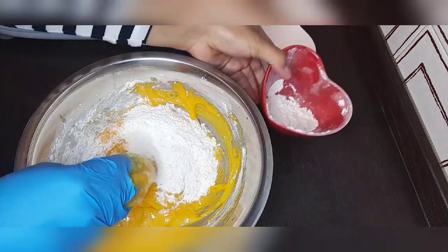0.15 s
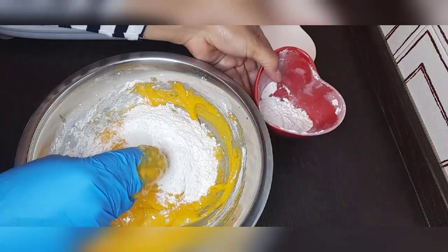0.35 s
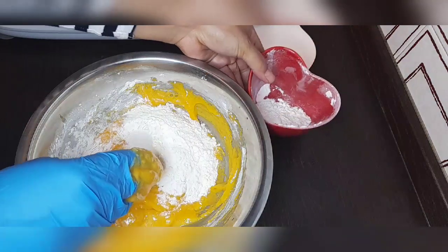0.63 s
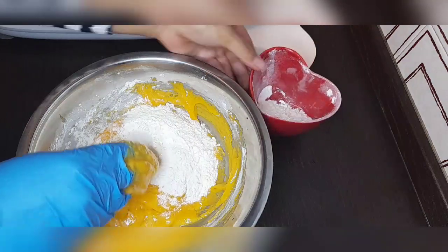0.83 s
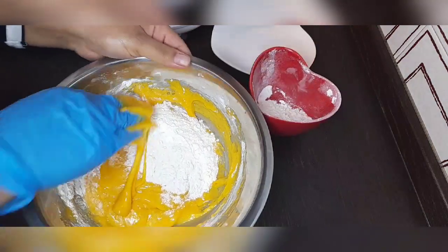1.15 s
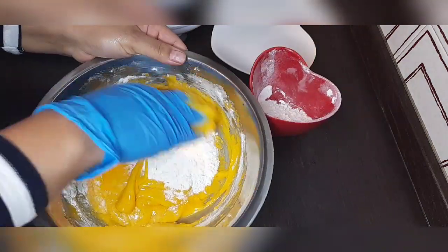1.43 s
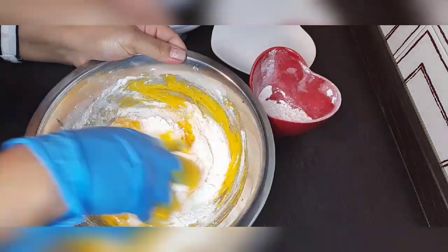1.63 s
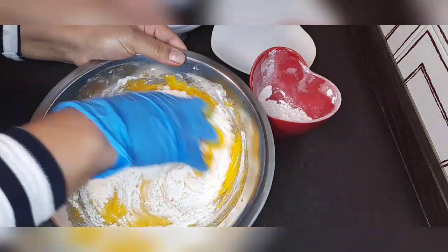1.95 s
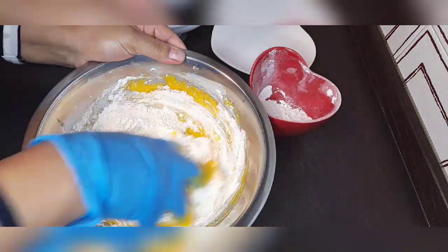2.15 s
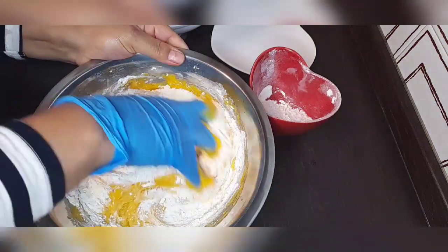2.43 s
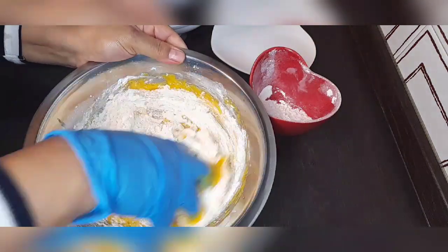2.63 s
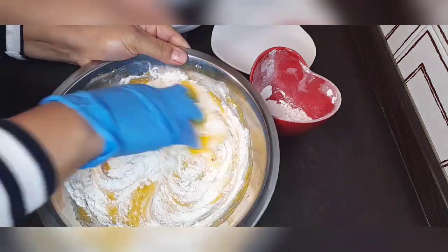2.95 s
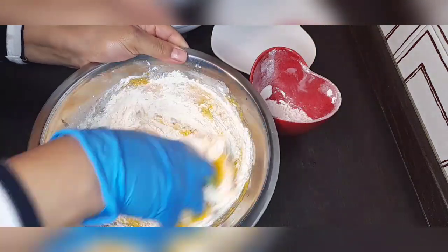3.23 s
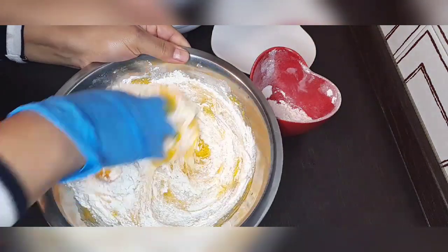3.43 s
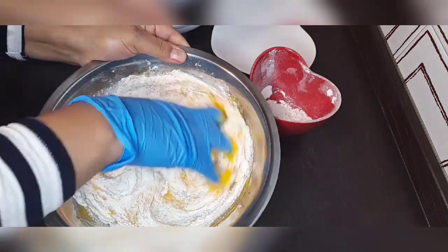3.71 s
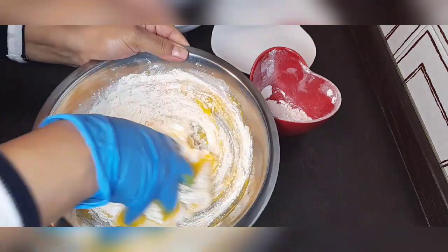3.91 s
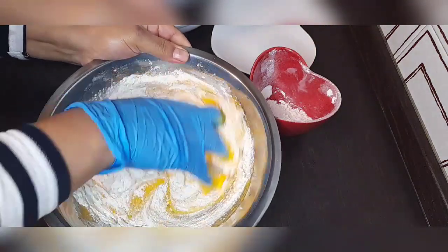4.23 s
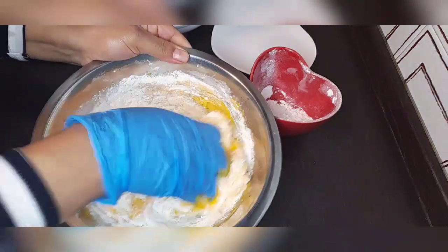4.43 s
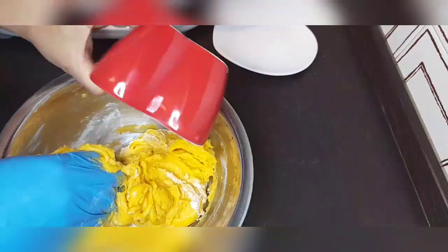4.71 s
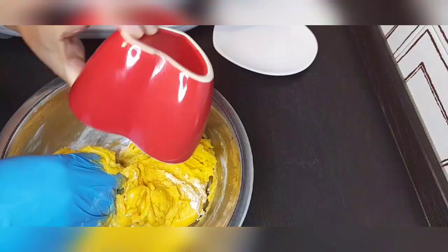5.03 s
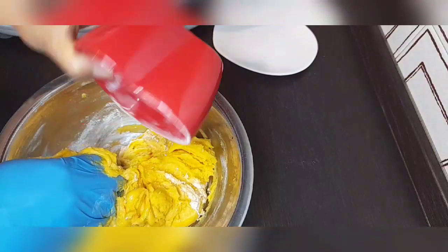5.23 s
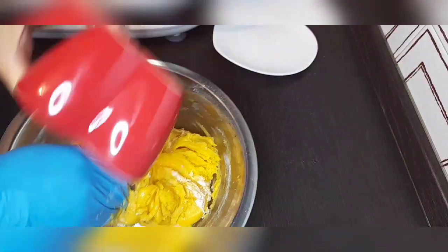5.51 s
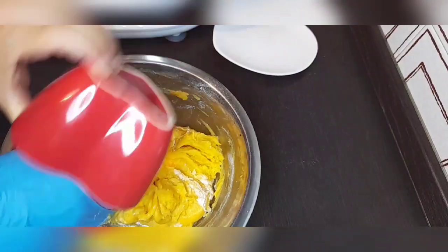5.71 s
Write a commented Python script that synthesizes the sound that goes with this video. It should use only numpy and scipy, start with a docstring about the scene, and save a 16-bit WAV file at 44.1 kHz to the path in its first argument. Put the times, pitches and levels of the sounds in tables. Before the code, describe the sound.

Mostly quiet, close stereo sound of dough being worked in a wide metal bowl. A cup is put down with a woody knock, followed half a second later by the loudest event, a hard bowl clatter. Then soft hissing strokes, tiny flour crunches and muffled taps, a faint nail tick, and a bright ceramic knock on steel. Short room tail, deep soft rumble and low hum.

```python
"""Mixing dough in a steel bowl

A gloved hand works flour round a wide steel bowl: swelling noise bands hiss and rumble, grains crunch.
A ceramic cup is set down on the kitchen counter; the bowl rocks hard once, and bumps softly on dough
before and after. Late on, the cup knocks on the rim. Blows are dense noise bursts plus ringing sine modes.
A noise tail gives the small room; soft air noise, a deep rumble and a faint hum lie underneath."""
import sys
import numpy as np
from scipy import signal
from scipy.fft import rfft, irfft, next_fast_len
from scipy.io import wavfile
from scipy.ndimage import uniform_filter1d

SR = 44100
rng = np.random.default_rng(int(sys.argv[2]) if len(sys.argv) > 2 else 0)


def store_wav(level_fs):
    """Save 16-bit WAV to argv[1]."""
    pcm = np.round(np.clip(np.atleast_2d(level_fs), -1, 1) * 32767)
    wavfile.write(sys.argv[1], SR, pcm.T.astype(np.int16))


N = 258426  # length in samples

# Pushes through the flour: peak_s, effort_db, attack_s, release_s (of the rub), bowl_rumble_db
SWEEPS = [(0.33, -91, .12, .04, -49), (1.981, -70, .15, 0.26, -59), (2.249, -65, .07, 0.057, -76),
          (2.84, -64, 0.1, 0.1, -73), (3.36, -64, 0.21, 0.096, -50.5), (3.98, -60, 0.18, 0.16, -50),
          (4.60, -60, 0.21, 0.049, -47.5), (5.07, -61, 0.21, 0.073, -51.5)]
# Glove skidding on the steel between pushes: peak_s, level_db, release_s
SKIDS = [(0.03, -70.5, .12), (0.19, -70.5, 0.12), (1.2, -64.5, .17), (3.186, -60, 0.097),
         (4.194, -58, 0.057), (4.43, -67, 0.044)]
# Loose flour sliding off the wall: peak_s, level_db
SLIDES = [(0.365, -74), (1.229, -78), (1.845, -63), (3.44, -66), (5.1, -69)]
# Flour crunching under the fingers: centre_s, half_length_s, level_db
CRUNCHES = [(2.233, 0.004, -54), (2.245, 0.03, -58), (2.507, 0.0046, -62), (2.796, 0.0022, -60),
            (2.804, 0.053, -59), (3.272, 0.07, -63), (5.019, 0.019, -59.5)]
# The hand stays in the flour: from_s, until_s
STIRRING_S = (1.665, 5.25)
# Colour of the glove rubbing: freq_hz, density_db (relative, per Hz)
RUB_COLOUR = [(400, -6.5), (900, 3), (1080, 2), (1280, 8), (1600, -1.5), (2000, 2), (3000, -0.5),
              (5000, -0.5), (7000, -5), (10000, -20)]
# Colour of loose powder: freq_hz, density_db (relative, per Hz)
POWDER_COLOUR = [(3000, -38.5), (5500, 1.5), (7200, 6.5), (8800, -1), (12500, 2), (14000, -19)]
# Colour of crunching flour: freq_hz, density_db (relative, per Hz)
CRUNCH_COLOUR = [(500, 12), (1200, 22), (2200, 13), (3500, 5.5), (6000, -0.5), (12000, -10)]
# Colour of the bowl rumbling: freq_hz, density_db (relative, per Hz)
RUMBLE_COLOUR = [(55, -33.5), (85, -6), (100, 11), (120, -20), (170, -15.5), (380, -23.5), (700, -25),
                 (1500, -66)]
DRAG_DB, IDLE_DB = -76, -83.5  # effort added while stirring; effort of the hand lying nearly still
RUB_DB, POWDER_DB = -1, -1.1  # shares of a firm push
FIRM_PUSH_DB, POWDER_GROWTH = -59.5, 1.27  # exponent: powder outgrows the rubbing under pressure
RUMBLE_RELEASE_S, RUMBLE_IDLE_DB = .12, -60  # one release for every push; steady floor
SKID_ATTACK_S = 0.024
SLIDE_ATTACK_S, SLIDE_RELEASE_S = 0.017, 0.014


def hand():
    """The glove rubs flour round the wall: powder hisses, the bowl rumbles, packed flour crunches."""
    t = np.arange(N) / SR
    in_flour = 1. * ((t > STIRRING_S[0]) & (t < STIRRING_S[1]))
    stirring = uniform_filter1d(in_flour, size=4000)
    drag = from_db(IDLE_DB) + from_db(DRAG_DB) * stirring

    # independent noises add in power, so their envelopes combine as root sums of squares
    pushes = [from_db(db) * swell(s, attack, release) for s, db, attack, release, _ in SWEEPS]
    effort = np.linalg.norm([drag] + pushes, axis=0)
    weights = [from_db(db) * swell(s, attack, RUMBLE_RELEASE_S) for s, _, attack, _, db in SWEEPS]
    weight = np.linalg.norm(weights, axis=0)
    skid = sum(from_db(db) * swell(s, SKID_ATTACK_S, release) for s, db, release in SKIDS)
    slide = sum(from_db(db) * swell(s, SLIDE_ATTACK_S, SLIDE_RELEASE_S) for s, db in SLIDES)
    pressure = effort / from_db(FIRM_PUSH_DB)
    stirred_up = from_db(FIRM_PUSH_DB + POWDER_DB) * pressure ** POWDER_GROWTH

    rub = np.hypot(from_db(RUB_DB) * effort, skid) * noise(RUB_COLOUR, N)
    powder = np.hypot(stirred_up, slide) * noise(POWDER_COLOUR, N)
    rumble = np.hypot(weight, from_db(RUMBLE_IDLE_DB)) * noise(RUMBLE_COLOUR, N)
    squeeze = sum(from_db(db) * np.exp(-((t - s) / length) ** 2) for s, length, db in CRUNCHES)
    crunch = squeeze * grains() * noise(CRUNCH_COLOUR, N)
    return (rub + powder + rumble + crunch) * from_db([[-.6], [.6]])


def swell(peak_s, attack_s, release_s):
    """Exponential rise to 1 and fall from it, given as time constants."""
    late = np.arange(N) / SR - peak_s
    return np.exp(-np.abs(late) / np.where(late < 0, attack_s, release_s))


GRAINS_PER_S, GRAIN_SPREAD_DB, GRAIN_S = 650, 2.5, .001  # mean rate; size spread; decay time constant


def grains():
    """Loudness of many tiny collapsing pockets of flour of uneven size; rms 1."""
    born = rng.random(N) < GRAINS_PER_S / SR
    sizes = from_db(GRAIN_SPREAD_DB * np.minimum(rng.exponential(1, N), 2))
    decay = np.exp(-1 / (GRAIN_S * SR))
    return rms_one(signal.lfilter([1], [1, -decay], born * sizes + 1e-18))


# Bowl rocking on the counter: start_s, level_db, driven_low_hz, driven_high_hz, free_rim_db
KNOCKS = [(1.4573, -26.5, 1103, 11880, -26.5), (1.462, -22, 211.4, 11980, -50.5),
          (1.4770, -15, 143.1, 1960, -51), (1.4808, -11.5, 259, 3180, -29.5),
          (1.4976, -14.5, 330, 4000, -50), (1.522, -27, 109, 754, -63), (1.5360, -21, 171, 1022, -92)]
# Lasting modes of the bowl: pitch_hz, level_db (relative), t60_s (before damping and the ring limit)
BOWL_MODES = [(92.15, -7.5, 0.56), (189.3, -2.5, 0.43), (272, -3.5, 0.53), (312, -0.5, .25),
              (388.3, 1, 0.24), (447, -9.5, 0.4), (533, -19.5, 0.5), (618, -21.5, 0.73), (760.8, -6, 0.43),
              (797, -10.5, 0.36), (874, -8, 0.17), (1015, -5.5, 0.23), (1107, -18.5, 0.99),
              (1207, -5.5, 0.36)]
# Modes of the free rim: pitch_hz, level_db (relative), t60_s (before damping and the ring limit)
RIM_MODES = [(1864.3, 3, 0.57), (2046, -3.5, 0.4), (2460, -7, .24), (4350, -16.5, .18), (5850, -15.5, 0.25),
             (9650, -24.5, .3), (12000, -18, .12)]
# Crowd of short-lived bowl modes: freq_hz, density_db (relative, per Hz)
BOWL_BODY = [(40, -19.5), (90, -2.5), (180, -10), (340, 2.5), (500, -11), (800, -8.5), (1400, -9.5),
             (2250, -23), (3100, -32.5), (4400, -31), (7000, -27.5), (9000, -35), (13000, -32)]
# Quickly damped bowl resonances: centre_hz, width_hz, level_db (before the shared peak level)
BOWL_PEAKS = [(3984, 27, -6.5), (3600, 130, -9.5), (4370, 53, -1), (5720, 23, 1.5), (7300, 35, -22.5),
              (9000, 43, -12), (10510, 45, -11.5), (10700, 130, -13.5), (12000, 34, -16.5)]
# Decay of the dense modes in bowl, counter and cup: freq_hz, t60_s
BODY_DECAY = [(100, 0.28), (400, 0.1), (1500, 0.073), (5000, 0.13), (12000, 0.055)]


def steel_bowl():
    """The bowl clatters on the counter: dense wall modes die quickly, while bowl and rim modes ring on."""
    clatter, ring = np.zeros((2, 2, N))
    wall = with_peaks(BOWL_BODY, BOWL_PEAKS, peak_db=-22.5)
    for s, db, low_hz, high_hz, rim_db in KNOCKS:
        body = dying(wall, BODY_DECAY, size=8192)
        add(clatter, s, contact(body, db, low_hz, high_hz))
        modes = ringing(BOWL_MODES, damping=1.1, size=28000)
        add(ring, s, contact(modes, db - 6.5, low_hz, high_hz))
        add(ring, s, from_db(rim_db) * ringing(RIM_MODES, damping=0.96, size=36000))
    return (kitchen(clatter, wet_db=-7.0) + kitchen(ring, wet_db=-17)) * from_db([[-1.9], [.6]])


# Bumps cushioned by dough: start_s, tap_level_db, tap_high_hz, counter_boom_db
BUMPS = [(0.109, -50, 490, -66), (1.235, -46, 519, -71.5), (2.0050, -48.5, 480, -51),
         (3.0090, -43, 790, -41), (3.3480, -57.5, 580, -55), (3.529, -47.5, 520, -54.5),
         (4.536, -50.5, 1200, -53.5), (4.9569, -51.5, 1390, -57), (5.165, -50.5, 1200, -43)]
# Dull tap of the cushioned bowl: freq_hz, density_db (relative, per Hz)
TAP_COLOUR = [(90, -18), (220, -5.5), (380, 4), (520, -6.5), (750, -1), (1200, -12.5), (2500, -13),
              (6000, -10)]
# Counter booming under the bowl: pitch_hz, level_db (relative), t60_s (before damping and the ring limit)
COUNTER_MODES = [(88.3, -1.5, 0.56), (96.3, -3, 0.42), (142, -5, 0.19)]


def bumps():
    """The held bowl gives a short, dull tap, and the counter booms under it."""
    out = np.zeros((2, N))
    for s, db, high_hz, boom_db in BUMPS:
        tap = dying(TAP_COLOUR, [(100, 0.067), (1500, 0.05)], size=4096)
        boom = ringing(COUNTER_MODES, damping=1.1, size=16000)
        add(out, s, contact(tap, db, 250, high_hz))
        add(out, s, contact(boom, boom_db, 40, 240.2))
    return kitchen(out, wet_db=-6.0) * from_db([[-1.2], [1.2]])


# Cup landing on the counter: start_s, level_db, driven_low_hz, driven_high_hz, foot_ring_db
LANDING = [(0.8631, -29.5, 795, 1794, -53.5), (0.9085, -23, 200.2, 5527, -50),
           (0.9197, -19.5, 110, 1017, -60), (0.9300, -22.5, 281.5, 3986, -49.5),
           (0.9380, -27, 1400, 4000, -52), (0.9485, -24.5, 181.3, 699, -65.5)]
# Counter ringing under the cup: pitch_hz, level_db (relative), t60_s (before damping and the ring limit)
LANDING_MODES = [(97.1, -9, 0.51), (185, -4, 0.48), (231.8, -5, 0.13), (304, -8.5, 0.35), (389.2, 2, 0.22),
                 (614, -16, .45), (666, -13.5, .48), (725, -17, 1), (844, -12.5, .25), (940.6, -21, .6),
                 (1200, -16, 0.31), (1420, -19, .5), (1914, -20, 0.2), (2369, -24, 0.56)]
# Thin ring of the cup on its foot: pitch_hz, level_db (relative), t60_s (before damping and the ring limit)
FOOT_MODES = [(2425, 2, 0.24), (3473, -14, 0.24), (3820, -0.5, .2), (3900, -15.5, .45), (4280, -7.5, .22),
              (4721, -12.5, .16), (5507, -13, .2), (6180, -18, .5), (6625, -15, 0.48), (6830, -11, .16),
              (8600, -16, .12), (10700, -17, .12), (12100, -17, 0.23)]
# Crowd of short-lived counter modes: freq_hz, density_db (relative, per Hz)
COUNTER_BODY = [(40, -24), (100, 0.5), (180, 0.5), (360, 3.5), (500, -7), (800, -8), (1300, -13),
                (2400, -22.5), (3100, -38), (7000, -25), (9000, -28), (13000, -24.5)]
# Quickly damped counter resonances: centre_hz, width_hz, level_db (before the shared peak level)
COUNTER_PEAKS = [(1035, 220, -3.5), (1492, 33, -2), (1670, 18.26, -8.5), (1870, 26.9, -12.5),
                 (1940, 27.62, -11.5), (2300, 26, -11), (2560, 27, -15.5), (2950, 35, -20),
                 (4040, 140, -18), (4100, 82, -20.5), (5400, 170, -33.5), (6320, 100, -16)]


def cup_set_down():
    """The foot of the cup touches, then chatters flat; most of the sound is the counter thudding."""
    clatter, ring = np.zeros((2, 2, N))
    top = with_peaks(COUNTER_BODY, COUNTER_PEAKS, peak_db=-3.5)
    for s, db, low_hz, high_hz, foot_db in LANDING:
        body = dying(top, BODY_DECAY, size=8192)
        add(clatter, s, contact(body, db, low_hz, high_hz))
        modes = ringing(LANDING_MODES, damping=1.0, size=24000)
        add(ring, s, contact(modes, db - 5.0, low_hz, high_hz))
        add(ring, s, from_db(foot_db) * ringing(FOOT_MODES, damping=0.73, size=30000))
    return (kitchen(clatter, wet_db=-7) + kitchen(ring, wet_db=-15)) * from_db([[-1.9], [1.4]])


# Cup touching the rim: start_s, level_db, driven_low_hz, driven_high_hz, lasting_ring_db
CLINKS = [(5.3320, -35, 690, 9000, -64.5), (5.3348, -14.5, 79.4, 13000, -25.5),
          (5.3399, -32, 6000, 13000, -61.5), (5.3470, -17, 298, 2570, -42)]
# Fingernail ticking on the cup: start_s, level_db
TICK = (5.2375, -56)
# Colour of that tick: freq_hz, density_db (relative, per Hz)
TICK_COLOUR = [(1000, -9), (5000, -11.5), (6800, 2.5), (8500, -4.5), (13000, -8.5)]
# Lasting modes of the cup: pitch_hz, level_db (relative), t60_s (before damping and the ring limit)
CUP_MODES = [(128.3, -9.5, 0.55), (174, -10.5, 0.34), (677, -11.5, 0.6), (708, -2, 0.48),
             (920, -11.5, 0.42), (1152, -7.5, 0.66), (1228, -2, 0.35), (1305, 4.5, 0.52), (1399, -5, 0.54),
             (1613, -10.5, 0.38), (1810, -10, 0.5), (1995, -11, 0.72), (2334, -7, .4), (2450, -7.5, 0.58)]
# High, glassy ring on the rim: pitch_hz, level_db (relative), t60_s (before damping and the ring limit)
GLAZE_MODES = [(6700, -15, 0.24), (6861, -13, .33), (7130, -13.5, 0.34), (10750, -20, .16)]
# Crowd of short-lived cup modes: freq_hz, density_db (relative, per Hz)
CUP_BODY = [(50, -19), (130, 1), (230, -8.5), (450, -21), (680, -3), (920, -8.5), (1350, 0), (2500, -6.5),
            (2850, -17.5), (5800, -28), (6900, -15.5), (7900, -28.5), (10800, -24), (12500, -34.5)]
# Quickly damped cup resonances: centre_hz, width_hz, level_db (before the shared peak level)
CUP_PEAKS = [(3640, 45, -30.5), (3890, 75, -15.5), (5240, 90, -11), (5850, 46, -14.5), (6470, 32, -7),
             (6700, 77, 3.5), (7400, 31, -11.5), (7300, 54, -15.5)]


def cup_on_rim():
    """A fingernail ticks on the cup; hard ceramic cracks on the steel rim, rebounds and rings briefly."""
    crack, ring = np.zeros((2, 2, N))
    tick_s, tick_db = TICK
    tick = dying(TICK_COLOUR, [(1000, .025), (7000, 0.056), (13000, .02)], size=4096)
    add(crack, tick_s, contact(tick, tick_db, 900, 13000))
    wall = with_peaks(CUP_BODY, CUP_PEAKS, peak_db=-6)
    modes = list(CUP_MODES) + list(GLAZE_MODES)
    for s, db, low_hz, high_hz, ring_db in CLINKS:
        body = dying(wall, BODY_DECAY, size=8192)
        add(crack, s, contact(body, db, low_hz, high_hz))
        add(ring, s, from_db(ring_db) * ringing(modes, damping=1.03, size=32000))
    return (kitchen(crack, wet_db=-8.5) + kitchen(ring, wet_db=-14.5)) * from_db([[-1.4], [.6]])


# Decay of the room tail: freq_hz, t60_s
KITCHEN_DECAY = [(80, 0.74), (250, 0.36), (600, 0.66), (1500, 0.59), (4000, 0.65), (7000, .46),
                 (12000, 0.57)]


def kitchen(x, wet_db):
    """Add the room: a diffuse noise tail that builds up quickly and dies at its own rate per octave."""
    colour = [(60, 0), (400, 3), (2000, 0.0), (6000, -3.5), (13000, -0.5)]
    tail = dying(colour, KITCHEN_DECAY, size=36000)
    tail = tail * (1 - fade(0.015, tail.shape[-1]))
    tail = tail / np.sqrt(np.sum(tail ** 2) / 2)  # unit energy per side
    return x + from_db(wet_db) * signal.fftconvolve(x, tail, axes=-1)[:, :N]


# Colour of the room air: freq_hz, density_db (relative, per Hz)
AIR_COLOUR = [(30, -28), (55, -14.5), (100, -5), (150, -15), (200, -25.5), (380, -16), (600, -32.5),
              (1000, -30.5), (2250, -41.5), (3400, -49), (5500, -50.5), (13000, -59)]
# Level curve of the deep rumble: time_s, level_db
DEEP_LEVEL = [(0, -54.5), (0.9, -53), (1.9, -53.5), (2.3, -59.5), (3.0, -59), (3.3, -57), (3.7, -61.5),
              (5.86, -62.5)]
# Colour of the deep rumble: freq_hz, density_db (relative, per Hz)
DEEP_COLOUR = [(25, -38), (36, -19.5), (48, 14), (62, 12.5), (78, -5.5), (130, -42)]
# Steady hum: pitch_hz, level_db (rms)
HUM = [(50, -74.5), (99.5, -66.5), (443, -80)]


def room_tone():
    """Soft air noise, a deep rumble of drifting level, and the steady sines of an appliance hum."""
    t = np.arange(N) / SR
    hum = sum(from_db(db) * np.sqrt(2) * np.sin(2 * np.pi * (hz * t + rng.random())) for hz, db in HUM)
    deep = from_db(np.interp(t, *np.transpose(DEEP_LEVEL))) * noise(DEEP_COLOUR, N)
    air = from_db(-62) * noise(AIR_COLOUR, N)
    return (air + deep + hum) * from_db([[-1.1], [.9]])


def contact(sound, db, low_hz, high_hz):
    """A blow drives only part of the range; its level is that of the first hundredth of a second."""
    driven = cut(cut(sound, low_hz, "high", order=1), high_hz, "low")
    return from_db(db) * driven / np.sqrt(np.mean(driven[:, :SR // 100] ** 2))


def with_peaks(spectrum, peaks, peak_db):
    """Raise resonances out of a smooth spectrum by adding their power."""
    hz = np.arange(20, 15000, 10)
    power = from_db(at_hz(spectrum, hz)) ** 2
    for centre, width, db in peaks:
        power = power + from_db(db + peak_db) ** 2 / (1 + ((hz - centre) / width) ** 2) ** 2
    return np.c_[hz, 10 * np.log10(power)]


def dying(spectrum, decay, size):
    """A burst of dense modes as coloured noise; each octave dies at its own rate."""
    bins = rfft(noise(spectrum, size))
    hz = np.fft.rfftfreq(size, 1 / SR)
    centres = np.geomspace(55, 14080, 9)
    # overlapping octave bands that sum to the whole
    shares = [at_hz(np.c_[centres, row], hz) for row in np.eye(len(centres))]
    return sum(irfft(bins * share, size) * fade(at_hz(decay, centre), size)
               for centre, share in zip(centres, shares))


LONGEST_RING_S = .75  # upper limit of any mode's t60


def ringing(modes, damping, size):
    """Distinct decaying sine modes, each reaching the two sides with phases of its own."""
    hz, db, t60 = np.transpose(modes)
    alike = np.clip(at_hz(LIKENESS, hz), -1, 1)
    apart = np.arccos(alike) * rng.choice([-1, 1], len(hz))  # phase gap between the sides
    phases = 2 * np.pi * rng.random(len(hz))
    turn = 2 * np.pi * np.arange(size) / SR
    return sum(from_db(d) * fade(min(t / damping, LONGEST_RING_S), size) * np.sin(f * turn + [[p], [p + a]])
               for f, d, t, p, a in zip(hz, db, t60, phases, apart))


# Stereo likeness for noise and modes: freq_hz, left_right_correlation (0 to 1)
LIKENESS = [(60, 0.83), (150, 0.98), (350, 0.58), (700, 0.48), (1300, 0.067), (2500, 0.0048), (13000, 0)]


def noise(spectrum, size):
    """Coloured stereo noise, alike on both sides in the bass; rms 1."""
    length = next_fast_len(size)
    hz = np.fft.rfftfreq(length, 1 / SR)
    mid, side = np.exp(2j * np.pi * rng.random((2, len(hz))))
    alike = np.clip(at_hz(LIKENESS, hz), -1, 1)
    pair = np.sqrt(1 + alike) * mid + np.sqrt(1 - alike) * side * [[1], [-1]]
    coloured = pair * from_db(at_hz(spectrum, hz)) * (hz > 20)
    return rms_one(irfft(coloured, length)[:, :size])


def fade(t60, size):
    """Exponential decay by 60 dB in t60 seconds."""
    return np.exp(-np.log(1000) * np.arange(size) / (SR * t60))


def cut(x, hz, kind, order=2):
    """Butterworth low- or high-pass."""
    sos = signal.butter(order, np.clip(hz, 10, .45 * SR), kind, fs=SR, output="sos")
    return signal.sosfilt(sos, x)


def at_hz(points, hz):
    """Read a table on a log-frequency axis."""
    known_hz, values = np.transpose(points)
    return np.interp(np.log(np.maximum(hz, 1)), np.log(known_hz), values)


def from_db(db):
    """Decibels to gain."""
    return 10 ** (np.asarray(db) / 20)


def rms_one(x):
    """Scale to unit power."""
    return x / np.sqrt(np.mean(x ** 2) + 1e-20)


def add(track, s, sound):
    """Mix a sound in at a time in seconds."""
    start = round(s * SR)
    track[:, start:start + sound.shape[-1]] += sound[..., :N - start]


def scene():
    """Everything heard from above the bowl."""
    return hand() + steel_bowl() + bumps() + cup_set_down() + cup_on_rim() + room_tone()


CUTOFF_HZ = 13200


def record(dry):
    """Peaks are rounded by soft saturation, and a steep low-pass cuts the top."""
    rounded = 1.3 * np.tanh(dry / 1.3)
    low_pass = signal.ellip(10, .2, 80, CUTOFF_HZ, fs=SR, output="sos")
    return signal.sosfilt(low_pass, rounded)


dry = scene()
out = record(dry)
store_wav(out)
```